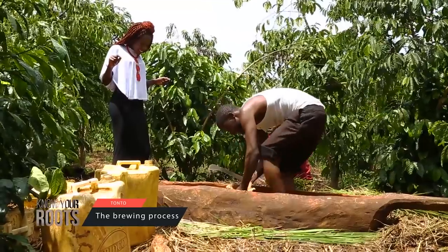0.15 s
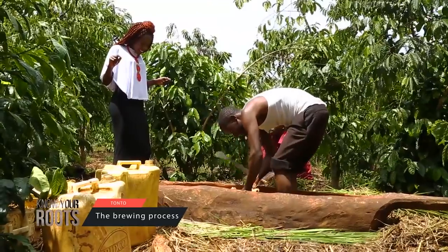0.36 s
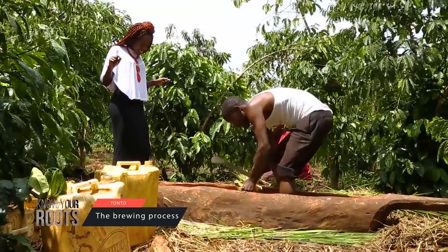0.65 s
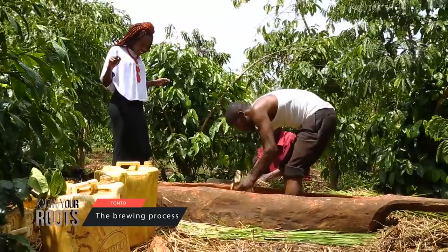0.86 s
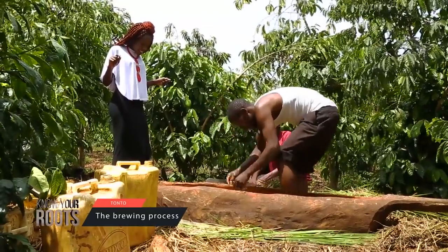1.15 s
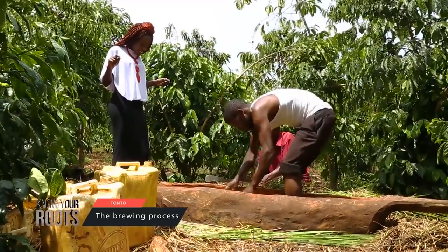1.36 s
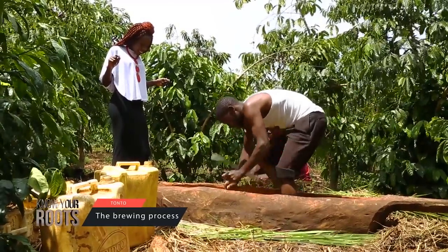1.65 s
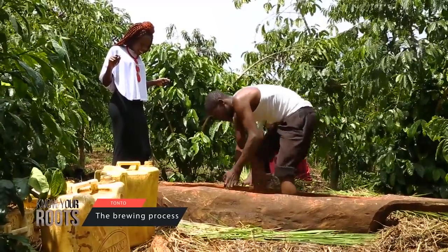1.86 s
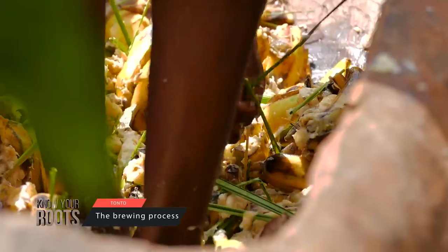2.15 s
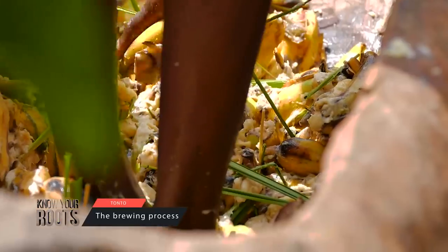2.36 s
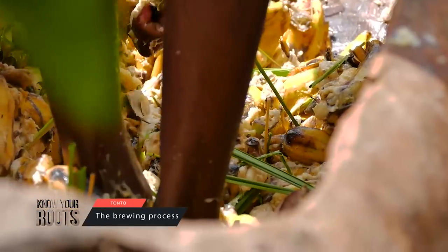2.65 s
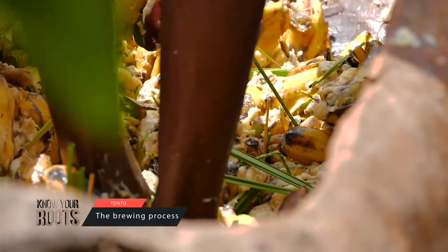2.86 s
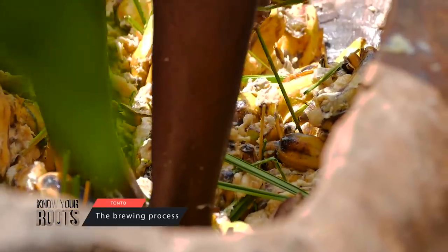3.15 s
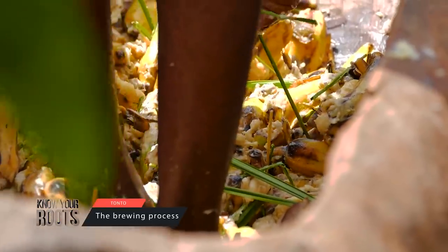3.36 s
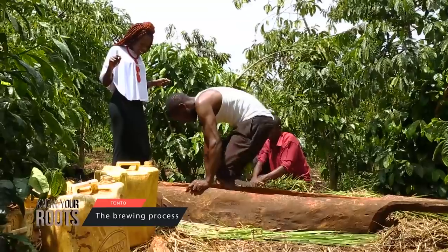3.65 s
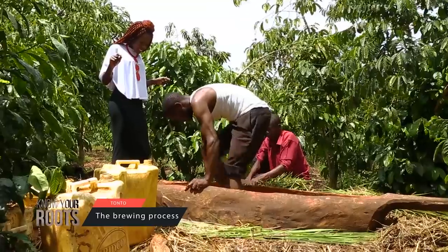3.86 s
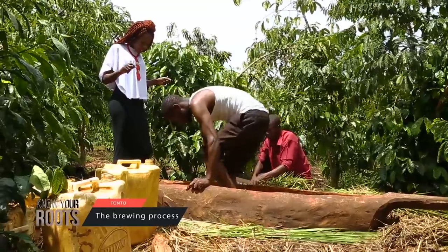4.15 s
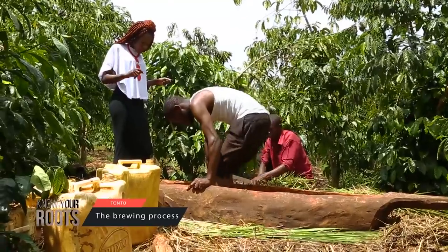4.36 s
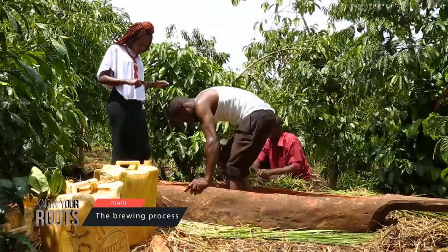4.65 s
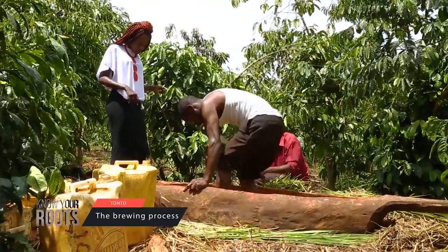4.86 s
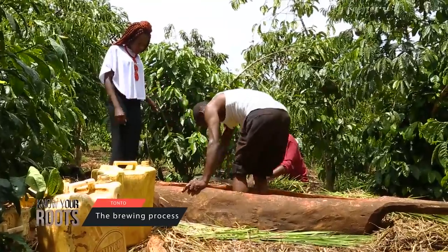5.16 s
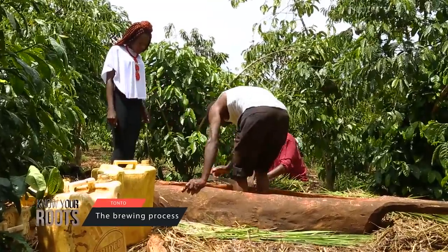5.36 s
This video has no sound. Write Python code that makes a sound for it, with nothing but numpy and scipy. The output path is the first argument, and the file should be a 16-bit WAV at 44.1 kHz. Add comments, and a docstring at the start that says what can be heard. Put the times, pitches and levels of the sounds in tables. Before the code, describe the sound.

Close, irregular wet squelching and crunchy crackling as feet tread banana pulp and grass in a wooden trough in a quiet garden.

```python
"""Bare feet tread ripe bananas and grass in a hollowed log, outdoors and close to the microphone.
Stick-slip pressure modulates filtered clicks and noise: pulp smacks, peel crackles, the log is loaded.
Showers of short decaying sines add bubbles, cracking grass blades and fizz.
Single snaps and air pockets ring, wet slaps are shaped noise, and blows excite modes of the wood.
Behind them lie a short diffuse tail and a quiet garden of slowly swelling filtered noise."""
import sys
import numpy as np
from scipy import signal
from scipy.fft import rfft, irfft
from scipy.io import wavfile
from scipy.ndimage import uniform_filter1d

SR = 44100
rng = np.random.default_rng(int(sys.argv[2]) if len(sys.argv) > 2 else 0)


def bounce(signal):
    """Save signal as a 16-bit WAV file at the path given by the first command-line argument."""
    frames = np.transpose(np.atleast_2d(signal))
    limited = np.clip(frames, -1, 1)
    pcm = np.round(limited * 32767).astype(np.int16)
    wavfile.write(sys.argv[1], SR, pcm)


N = 243387
TIME = np.arange(N) / SR  # s

# All levels are relative: the functions below weight them further.
# A foot pressed into the mash: start t/s, attack t/s, hold t/s,
# pulp level/dB, peel level/dB, weight on the log level/dB
TREADS = [(0.0, 0.0011, 0.012, -29, -26, -29), (0.253, 0.064, 0.1, -36.5, -30, -42),
          (0.448, 0.076, .10, -29, -25.5, -32.5), (0.867, .013, 0.015, -32.5, -28, -37),
          (1.02, .012, .115, -32.5, -28.5, -36.5), (1.306, 0.038, 0.051, -32, -25.5, -37),
          (1.516, 0.059, 0.053, -33, -29, -39), (1.937, 0.043, 0.076, -21.5, -19, -27.5),
          (2.205, .025, 0.054, -31, -33, -38.5), (2.57, 0.078, 0.15, -27, -27, -34),
          (3.051, 0.074, 0.068, -30.5, -27.5, -37), (3.502, 0.049, 0.066, -27, -22, -29),
          (3.961, 0.058, 0.095, -25, -21.5, -25), (4.358, 0.039, 0.085, -24, -20.5, -23.5),
          (4.761, 0.042, 0.065, -24, -22, -28.5), (5.142, 0.062, 0.038, -28, -23.5, -35.5),
          (5.349, 0.02, 0.095, -34, -32, -36.5)]
# Feet dragged and grass worked between the presses: middle t/s, length t/s, crackle level/dB
RUBS = [(0.134, 0.42, -30.5), (0.393, 0.035, -28), (0.719, 0.22, -28.5), (0.845, 0.067, -26.5),
        (1.007, 0.22, -30), (1.266, 0.25, -40.5), (1.5, 0.16, -28), (1.705, 0.27, -31.5),
        (1.919, 0.12, -25.5), (2.178, 0.091, -32), (2.42, 0.12, -32), (2.549, .14, -25),
        (2.951, 0.039, -27.5), (3.718, 0.18, -34), (4.346, 0.31, -31.5), (4.612, 0.21, -30.5),
        (4.736, 0.19, -33.5), (4.987, 0.15, -26), (5.07, 0.18, -30.5), (5.173, 0.096, -20.5),
        (5.32, 0.27, -32), (5.478, 0.08, -26.5)]
# Answer of each part to the foot: swell in mid press level/dB, share of a rub level/dB, rest level/dB
PULP_ANSWER = (1.43, -11.5, -46)
PEEL_ANSWER = (2.8, 0, -42)
LOG_ANSWER = (1.1, -17.5, -49)
# Spectral density of the squeezed pulp: f/Hz, level/dB per Hz
PULP_SPECTRUM = [(130, -29), (220, -11.5), (300, 0), (450, -7.5), (620, 0.5), (800, 4), (1100, -4),
                 (1400, -6.5), (2000, -20), (4000, -53)]
# Spectral density of the crushed peel: f/Hz, level/dB per Hz
PEEL_SPECTRUM = [(400, -17), (1200, -2), (1900, -2.5), (2500, -2), (3200, -1.5), (4000, 2.5), (5000, 0),
                 (6600, -0.5), (8200, -1.5), (10000, -0.5), (12500, -3), (15500, -6.5)]
# Spectral density of the log under load: f/Hz, level/dB per Hz
LOG_SPECTRUM = [(15, -26), (35, -19), (70, -13.5), (120, -10), (180, 0), (290, -1), (420, 3), (800, -41.5)]
# Edges between the independently varying regions of the peel crackle: f/Hz
FOLD_EDGES = [1480, 2720, 4300, 6300, 8060, 11700]
# Stalks and peel snapping: t/s, level/dB, ring f/Hz
SNAPS = [(0.03, -12.5, 6000), (0.0626, -7, 7260), (0.092, -11, 3500), (.206, -19, 3780), (.257, -8, 3470),
         (0.4636, 1, 3750), (0.4839, -5, 3480), (0.4894, -6.5, 3420), (.5225, -8, 6550), (.618, -10, 6350),
         (.694, -14, 7000), (0.7723, -23, 3300), (.914, -9, 4020), (0.917, -11, 6900), (1.362, -12, 3700),
         (1.370, -9, 3550), (1.4505, -14, 2400), (1.4852, -16.5, 3800), (1.606, -12, 7700),
         (1.63, -8.5, 3560), (1.634, -12, 7440), (1.758, -18, 4550), (2.007, -4, 3200), (2.7302, -5, 3500),
         (2.747, -8.5, 8150), (2.946, -23, 4000), (3.383, -11, 3170), (3.408, -15.5, 1970),
         (3.623, -4, 7500), (3.6362, -4, 6800), (3.691, -12, 3060), (3.827, -21, 2830),
         (4.362, -13.5, 3500), (4.419, -3.5, 3930), (4.471, -13, 6700), (4.946, -7, 3820),
         (5.223, -10, 3170), (5.468, -11.5, 6640)]
# Air pockets bursting in the pulp: t/s, level/dB, initial f/Hz
POPS = [(.001, -7.5, 1020), (.002, -11, 460), (.602, -11.5, 850), (1.028, -14.5, 790), (1.048, -16, 756),
        (1.080, -14.5, 750), (1.144, -17, 770), (1.629, -16.5, 436), (1.758, -16.5, 461),
        (2.022, -12.5, 620), (2.278, -19, 630), (2.3745, -5, 467), (2.805, -17, 610), (2.9777, 1.5, 563),
        (2.978, -11, 350), (3.693, -15, 380), (3.984, -12.5, 950), (4.004, -10.5, 750), (4.032, -10, 294),
        (4.127, -17, 395), (4.387, -8.5, 520), (4.42, -12.5, 260), (4.517, -13.5, 770), (4.699, -29, 660),
        (4.814, -14, 710), (4.848, -12.5, 313), (4.9475, -13, 810), (5.385, -21.5, 730)]
# A fruit giving way at once, a wet slap or crunch: t/s, level/dB, t60/s, tilt/(dB per octave)
SLAPS = [(0.083, -19.5, 0.071, 0.5), (0.5204, -13, .016, 10), (0.912, -19.5, 0.04, 2.5),
         (1.027, -13, 0.026, 9), (1.633, -11, 0.03, -0.5), (1.757, -15.5, 0.016, -4),
         (1.975, -12.5, 0.064, 5), (2.019, -12, .014, -3), (2.03, -8.5, 0.055, 2), (2.063, -6, 0.025, 7),
         (2.233, -21.5, 0.019, 1), (2.37, -6.5, 0.063, 2), (2.974, -6, 0.03, 1), (2.983, -11, 0.061, 3),
         (3.171, -18.5, 0.054, -8), (3.38, -27.5, 0.1, -1.5), (3.474, -23.5, 0.022, 0.5),
         (3.636, -9.5, 0.035, 1), (3.691, -16, 0.035, -6), (4.07, -16.5, 0.065, -0.5),
         (4.518, -16, 0.054, -4), (4.944, -11.5, 0.029, -1), (4.957, -17, 0.028, 0), (5.139, -20, 0.09, 3)]
# Spray of a slap before its tilt: f/Hz, level/dB
SPRAY_SPECTRUM = [(20, -22), (80, -12.5), (350, 3), (900, 1.5), (2200, -3.0),
                  (3800, 0.0), (5200, -6.0), (8000, -2.5), (15500, -14.0)]
# Modes of the hollow of the trough: f/Hz, level/dB, t60/s
HOLLOW_MODES = [(503, 1.5, 0.16), (526, -14, 0.23), (591, -11, 0.12), (1500, -22, .1)]
# Hard blows on the hollow: t/s, level/dB
HOLLOW_BLOWS = [(2.984, -12)]
# Modes of the log's wall under a heel: f/Hz, level/dB, t60/s
WALL_MODES = [(75, -28, .07), (115, -21, 0.37), (156.3, -20, 0.31), (295, 7, 0.042), (430, -32, 0.051),
              (717, 0, 0.075), (1130, 2, 0.018)]
# Heels striking the wall: t/s, level/dB
HEEL_BLOWS = [(3.179, -14.5)]
# Chosen colour of a faint, slight stereo widening: f/Hz, level/dB
WIDENING_SPECTRUM = [(25, 8), (100, -9), (400, 2.5), (2000, -6), (12000, 6.5)]
# Spectral density of the garden air: f/Hz, level/dB per Hz
GARDEN_SPECTRUM = [(15, -22), (40, -5), (100, 1), (400, -7), (900, -7), (1800, -7.5), (3500, -11.5),
                   (8000, -15), (15500, -14)]

RELEASE_T60_S = 0.37  # the mash quietens once the foot stops sinking
POP_CYCLES = 19.8  # cycles to fall by 60 dB, so lower-pitched pockets ring longer
CRACK_T60_S, RUSTLE_T60_S = .003, .035
HISS_DB, STRAND_SPREAD_DB = -2, 3.5
BEAD_CYCLES, BLADE_CYCLES = 26, 28
GARDEN_DB = -49
TOP_HZ = 15800


def treading():
    """Stick-slip friction: jerky sinking drives pulp, peel and log, while rings follow the pressing."""
    pulp_db = working("pulp", *PULP_ANSWER)
    peel_db = working("peel", *PEEL_ANSWER)
    weight_db = working("log", *LOG_ANSWER)
    sinking = slips(rate=220, decay_s=0.0048, steady=1.62)

    smack = colour(clicks(rate=1300, spread_db=4.0) * sinking, PULP_SPECTRUM)
    ruptures = clicks(rate=6000, spread_db=0.5)
    hiss = undb(HISS_DB) * rng.standard_normal(N)
    crackle = colour((ruptures + hiss) * sinking, PEEL_SPECTRUM)
    crackle = shifting(crackle, FOLD_EDGES, rate=70, depth_db=1)
    weight = colour(clicks(rate=1300, spread_db=1.5) * sinking, LOG_SPECTRUM)

    # trapped air rings as bubbles of two sizes
    bubbles = grains(rate=170, hz=642, octaves=0.46, cycles=19.6, spread_db=3.0, glide=0.065)
    beads = grains(rate=180, hz=1566, octaves=0.666, cycles=BEAD_CYCLES, spread_db=6.0, glide=0.17)
    # grass blades crack with a lower and a higher ring; juice fizzes above them
    blades = grains(rate=380, hz=3346, octaves=0.26, cycles=BLADE_CYCLES, spread_db=4.0, glide=0)
    fibres = grains(rate=380, hz=7090, octaves=0.2, cycles=80, spread_db=4, glide=0)
    fizz = grains(rate=300, hz=11340, octaves=0.5, cycles=36, spread_db=-1.5, glide=0)
    # sticky strands part in lone ticks; half the level swing lets them stand out between treads
    strands = colour(clicks(rate=70, spread_db=STRAND_SPREAD_DB), PEEL_SPECTRUM)
    strands = strands * undb(-31.5 + .5 * peel_db)

    pulp = undb(-4.0) * smack + undb(-4.0) * bubbles + undb(-10.5) * beads
    peel = undb(-2.5) * crackle + undb(-10.5) * blades + undb(-11.0) * fibres + undb(-14.5) * fizz
    load = undb(-0.5) * weight * undb(weight_db)
    return pulp * undb(pulp_db) + peel * undb(peel_db) + strands + load


def working(part, swell_db, rub_db, rest_db):
    """Addition of powers: presses build, swell and decay, rubs come and go; returns level/dB."""
    power = np.full(N, undb(rest_db) ** 2)
    for s, attack, hold, pulp_db, peel_db, log_db in TREADS:
        db = {"pulp": pulp_db, "peel": peel_db, "log": log_db}[part]
        t = TIME[:SR] - attack  # zero when the hold begins
        swell = swell_db * np.sin(np.pi * np.clip(t / hold, 0, 1))
        release = -60 * np.maximum(t - hold, 0) / RELEASE_T60_S
        onset = np.clip(1 + t / attack, 0, 1)
        add(power, s, (onset * undb(db + swell + release)) ** 2)
    for middle, length, db in RUBS:
        arch = np.cos(np.pi * np.clip((TIME - middle) / length, -.5, .5))
        power += (undb(db + rub_db) * arch) ** 2
    return 10 * np.log10(power)


def slips(rate, decay_s, steady):
    """Stick-slip: pressure is let go in sudden jerks that decay exponentially, over a steady creep."""
    starts = (rng.random(N) < rate / SR) * rng.random(N)
    jerks = signal.lfilter([1], [1, -np.exp(-1 / (decay_s * SR))], starts)
    return unit(abs(steady) + unit(jerks))


def shifting(x, edges_hz, rate, depth_db):
    """Time-varying filtering: folds of peel open and close, so each spectral region swells on its own."""
    out, rest = 0, x
    for hz in edges_hz:
        band = signal.sosfiltfilt(signal.butter(4, hz, fs=SR, output="sos"), rest)
        out = out + band * undb(depth_db * walk(rate))
        rest = rest - band
    return unit(out + rest * undb(depth_db * walk(rate)))


def snaps(ring_s=0.004, tail_db=-22, crack_db=-5, rise_s=0.00023):
    """Brittle fracture: a brief ring, a crack weaker above that pitch and a faint rustle behind it."""
    out, t = np.zeros(N), TIME[:SR // 16]
    for s, db, hz in SNAPS:
        shape = undb(crack_db - 60 * t / CRACK_T60_S) + undb(tail_db - 60 * t / RUSTLE_T60_S)
        spectrum = [(100, -22), (600, -8), (hz / 2, -9), (hz, 0), (2.17 * hz, -8), (3 * hz, -19)]
        snap = colour(rng.standard_normal(len(t)) * shape, spectrum)
        add(snap, 0, undb(5.5) * ring(hz, ring_s))
        add(out, s, undb(db) * snap * (1 - np.exp(-t / rise_s)))
    return out


def pops(glide=0.12, splutter_db=-11, low_cut_hz=130):
    """Bubble resonance: escaping air rings upward and splutters; so small a pocket radiates little bass."""
    out = np.zeros(N)
    for s, db, hz in POPS:
        t60 = POP_CYCLES / hz
        tone = ring(hz, t60, glide)
        splutter = rng.standard_normal(len(tone)) * undb(-60 * TIME[:len(tone)] / t60)
        splutter = colour(splutter, PULP_SPECTRUM)
        add(out, s, undb(db) * (tone + undb(splutter_db) * splutter))
    return signal.sosfilt(signal.butter(1, low_cut_hz, "high", fs=SR, output="sos"), out)


def slaps(swell_s=0.0022, bass_hz=400):
    """Wet impact: skin meets pulp over milliseconds and sprays droplets, a decaying broadband burst."""
    out, t = np.zeros(N), TIME[:SR // 8]
    droplets = 0.7 * clicks(rate=8000, spread_db=-1.5) + 0.63 * rng.standard_normal(N)
    for s, db, t60, tilt in SLAPS:
        shape = (1 - np.exp(-t / swell_s)) * undb(-60 * t / t60)
        # the tilt turns about 1 kHz and stays constant below bass_hz
        spray = [(hz, level + tilt * np.log2(max(hz, bass_hz) / 1000)) for hz, level in SPRAY_SPECTRUM]
        burst = droplets[int(s * SR):][:len(t)] * shape
        add(out, s, undb(db + 3.5) * colour(burst, spray))
    return out


def knocks(blows, modes):
    """Modal superposition: each blow rings the same set of damped modes."""
    out = np.zeros(N)
    for s, db in blows:
        for hz, mode_db, t60 in modes:
            add(out, s, undb(db + mode_db) * ring(hz, t60))
    return out


def diffuse_tail(x, t60):
    """Convolution with exponentially decaying noise: each sound is smeared into a short, dense tail."""
    t = TIME[:SR // 4]
    tail = rng.standard_normal(len(t)) * undb(-60 * t / t60)
    return signal.fftconvolve(x, tail / np.linalg.norm(tail))[:N]


def garden():
    """Broadband noise: faint air and leaves whose level wanders slowly."""
    air = colour(rng.standard_normal(N), GARDEN_SPECTRUM)
    return air * undb(GARDEN_DB + 2.0 * walk(1.87))


def clicks(rate, spread_db):
    """Poisson-like impulses: random tiny ruptures with exponentially spread levels, scaled to rms 1."""
    chance, size, sign = rng.random(N), rng.exponential(size=N), rng.choice([-1, 1], N)
    return unit((chance < rate / SR) * sign * undb(spread_db * np.minimum(size, 4)))


def grains(rate, hz, octaves, cycles, spread_db, glide):
    """Superposed random resonances: a shower of short rings scattered in pitch round hz."""
    out = np.zeros(N)
    for when, pitch, size, sign in rng.random((int(rate * N / SR), 4)):
        f = hz * 2 ** (octaves * (2 * pitch - 1))
        strength = np.sign(sign - .5) * undb(-spread_db * np.log(max(size, .02)))
        add(out, when * N / SR, strength * ring(f, cycles / f, glide))
    return unit(out)


def ring(hz, t60, glide=0):
    """Damped oscillation: a dying sine whose pitch rises by the fraction glide over its t60."""
    t = TIME[:int(t60 * SR) + 2]
    return np.sin(2 * np.pi * hz * t * (1 + glide * t / t60 / 2)) * undb(-60 * t / t60)


def colour(x, points):
    """Minimum-phase filtering to a (f/Hz, level/dB) shape, so that clicks keep a sharp front."""
    hz, db = np.transpose(points)
    size = 4096
    grid_hz = np.arange(size // 2 + 1) * SR / size
    gain = undb(np.interp(np.log(grid_hz + 1), np.log(hz), db))
    # folding the cepstrum onto positive times makes the response causal
    cepstrum = irfft(np.log(gain))
    cepstrum[1:size // 2] *= 2
    cepstrum[size // 2 + 1:] = 0
    response = irfft(np.exp(rfft(cepstrum)))
    return signal.fftconvolve(x, response / np.linalg.norm(response))[:len(x)]


def walk(rate):
    """Low-pass random process: smoothed random steps, rate per second, scaled to rms 1."""
    k = max(int(SR / rate), 1)
    steps = np.repeat(rng.standard_normal(N // k + 2), k)
    return unit(uniform_filter1d(steps, k)[:N])


def undb(db):
    """Level to amplitude ratio: 20 dB is a factor of ten."""
    return 10 ** (np.asarray(db) / 20)


def unit(x):
    """Normalisation to rms 1."""
    return x / np.sqrt(np.mean(x ** 2))


def add(track, s, sound):
    """Linear superposition: mix a sound into the track from time s."""
    i = max(int(s * SR), 0)
    track[i:i + len(sound)] += sound[:N - i]


def scene():
    """Mid-side superposition: treading stays central, with a faint, slight stereo widening."""
    blows = knocks(HOLLOW_BLOWS, HOLLOW_MODES) + knocks(HEEL_BLOWS, WALL_MODES)
    work = treading() + snaps() + pops() + slaps() + blows
    # the trough and bushes scatter a short, faint tail
    mid = work + undb(-18) * diffuse_tail(work, t60=0.24) + garden()
    widening = colour(diffuse_tail(work, t60=0.029), WIDENING_SPECTRUM)
    side = undb(-22.5) * widening + undb(-12) * garden()
    return np.array([mid + side, mid - side])


def record(dry, low_cut_hz=42):
    """Band limiting and overload: the deepest bass is shed, peaks clip, then the top is cut."""
    thin = signal.sosfilt(signal.butter(2, low_cut_hz, "high", fs=SR, output="sos"), dry)
    clipped = np.clip(thin, -.88, .88)
    return signal.sosfilt(signal.ellip(10, .2, 90, TOP_HZ, fs=SR, output="sos"), clipped)


dry = scene()
out = record(dry)
bounce(out)
```